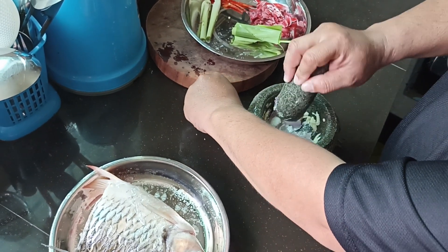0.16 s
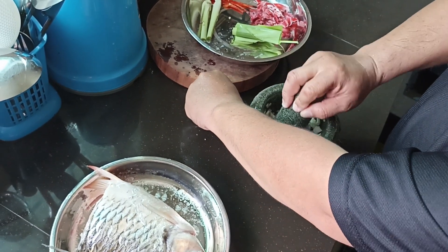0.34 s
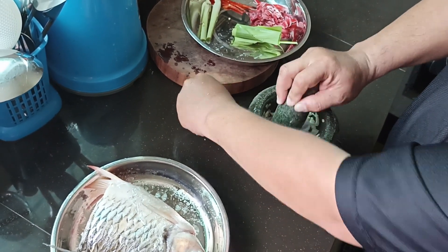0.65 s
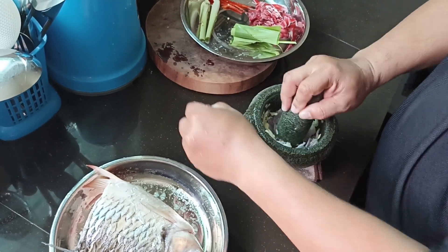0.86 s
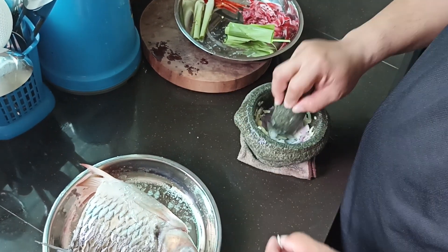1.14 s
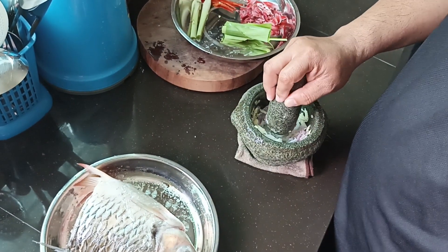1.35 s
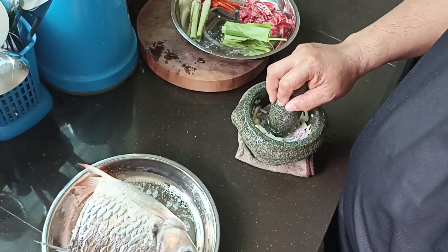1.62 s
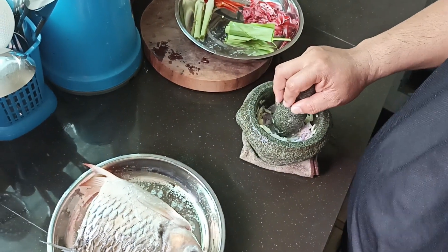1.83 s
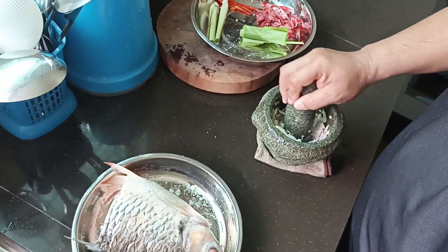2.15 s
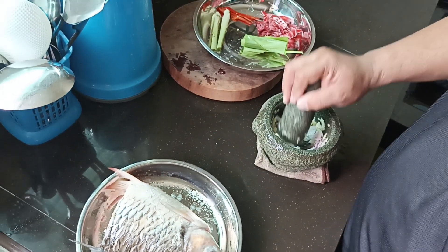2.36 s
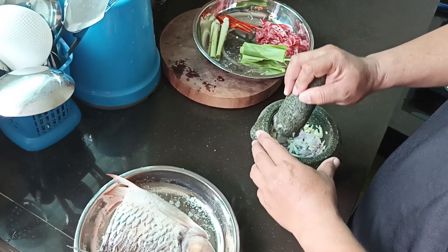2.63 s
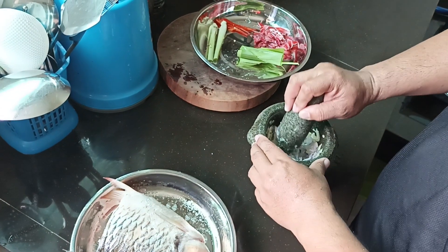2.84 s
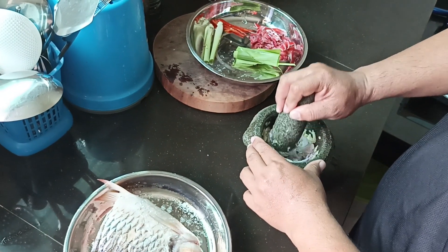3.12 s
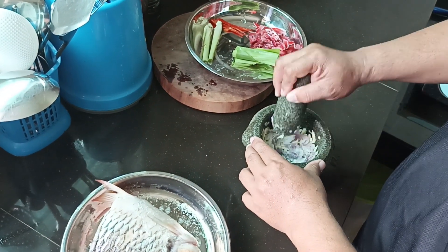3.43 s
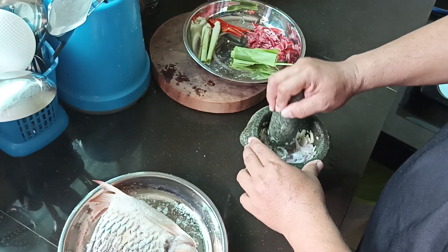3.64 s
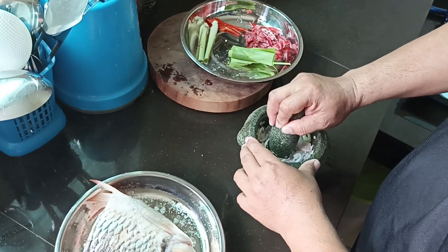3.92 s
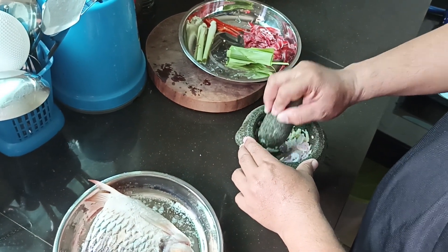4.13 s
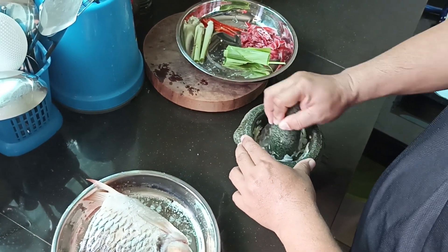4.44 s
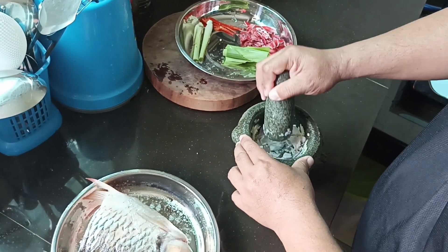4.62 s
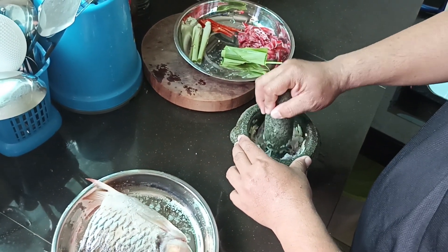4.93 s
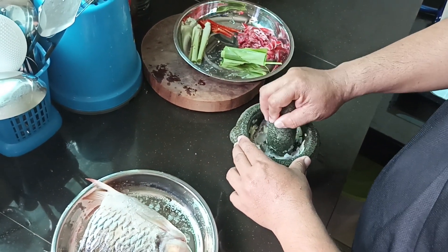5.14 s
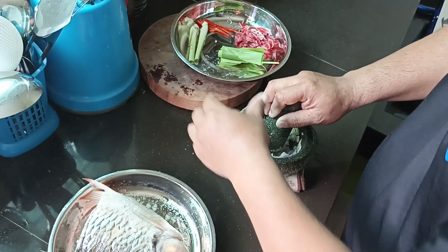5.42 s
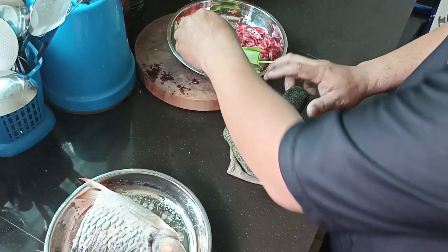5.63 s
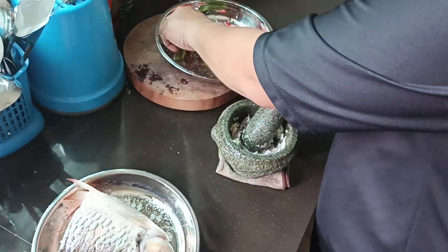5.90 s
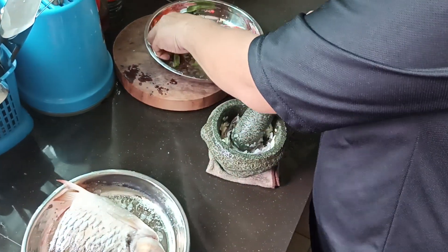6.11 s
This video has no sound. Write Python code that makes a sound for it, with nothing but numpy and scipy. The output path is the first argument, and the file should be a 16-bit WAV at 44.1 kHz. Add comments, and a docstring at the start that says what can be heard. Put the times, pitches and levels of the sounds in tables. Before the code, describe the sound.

On a home kitchen counter a stone pestle pounds moist spices in a small stone mortar, about three strokes a second. Firm strokes crunch and knock with a quick rebound; softer presses only squash. A few bare stone clacks stand out, the last near the end, before pounding stops and fingers rustle lightly in greens. Low appliance hum throbs underneath with soft fan air. Close stereo microphone, brief hard room ring.

```python
"""Appliance motors hum and beat under soft fan noise, with a faint hissing whistle that sinks in pitch and fades.
Then a stone pestle pounds moist spices in a stone mortar on a kitchen counter, about three strokes a second.
Firm strokes crunch, knock through the paste and rebound; gentle presses only squash and slip; three times bare
stone clacks; a hand rustles in a bowl of greens at the end. The hum is beating sines, crunch and rustle are clustered
snaps, each knock is a band-limited blow coloured by the mortar's modes; the hard room rings briefly after them."""
import sys
import numpy as np
from scipy import signal
from scipy.fft import rfft, irfft
from scipy.io import wavfile

SR = 44100
rng = np.random.default_rng(int(sys.argv[2]) if len(sys.argv) > 2 else 0)


def file_out(sig):
    """Save sig as 16-bit WAV at sys.argv[1]."""
    # one column per channel
    cols = np.atleast_2d(sig).T
    # limit, then scale
    lim = np.clip(cols, -1, 1)
    pcm = np.round(lim * 32767).astype(np.int16)
    wavfile.write(sys.argv[1], SR, pcm)


N = 276507
TIME = np.arange(N) / SR

# mains hum and slipping motors: [f/Hz, rms level/dB]
HUM_LINES = [(99.93, -27.6), (102.9, -41), (111.9, -43), (114.8, -34), (122.2, -45), (131.3, -46),
             (155.1, -35.5), (167, -49), (178.9, -43), (199.86, -45), (202.8, -50), (235.6, -50),
             (250.6, -43), (286.4, -46), (357.9, -53), (381.8, -50), (399.75, -50), (405.7, -54),
             (524.7, -58), (663, -62)]
# spectrum of fan rumble and air, before its overall level is set: [f/Hz, relative density/dB]
AIR_SPECTRUM = [(25, -30), (55, -24), (88, -20), (102, 2.5), (140, -6), (210, -13.5), (280, -10),
                (405, -11.5), (450, -18.5), (750, -25), (1300, -34), (2400, -41), (4500, -51.5),
                (10500, -57.5), (15500, -59)]
# likeness of the two channels in the fan noise: [f/Hz, likeness/0-1]
CHANNEL_LIKENESS = [(30, 0.94), (110, 0.95), (250, 0.69), (500, 0.64), (1200, 0), (5000, 0), (15000, 0)]
# path of the faint whistle: [t/s, f/Hz, relative level/dB]
WHISTLE_PATH = [(0, 6200, 0.5), (2.3, 6270, -1), (3, 6170, 0), (4, 5970, -1.5), (4.8, 5930, -5),
                (6.27, 5930, -8.5)]
# firm strokes: [t/s, crunch level before trim/dB, time the spices take to give way/s, knock level/dB,
# knock centre f/Hz, level of the thud into the counter/dB]
FIRM_STROKES = [(.254, -22, .0032, -16.5, 1180, -36), (.5686, -29, 0.0067, -19, 1300, -28),
                (.869, -31.5, .011, -20.5, 1370, -31), (1.1525, -29, 0.011, -25, 1310, -39),
                (1.4922, -24, .0035, -22, 2140, -48), (2.1035, -28.5, 0.0099, -14, 1310, -50),
                (2.410, -25.5, .0075, -5, 1340, -27.5), (3.0036, -23.5, 0.004, -16, 1420, -30),
                (3.2595, -36.5, .017, -8.5, 770, -37), (3.892, -25.5, 0.0047, -11.5, 1640, -27),
                (4.4512, -30.5, .015, -13.5, 1230, -40), (4.7955, -23.5, 0.0082, -7, 1420, -25),
                (5.102, -28, 0.0064, -11, 1190, -46)]
# gentle presses that do not reach the stone: [t/s, crunch level before trim/dB]
GENTLE_PRESSES = [(2.708, -33.5), (3.544, -39), (4.172, -34.5), (5.3645, -35)]
# spectrum of crushed fibres and juice: [f/Hz, relative level/dB]
CRUNCH_SPECTRUM = [(300, -27), (800, -14), (1200, 4), (1800, 0), (2600, 2.5), (3450, 3.5), (4200, -1),
                   (6100, 2), (8500, -4), (10800, -6), (12200, 2.5), (14000, -5.5), (15500, -6.5),
                   (16500, -12)]
# modes of the mortar on its cloth: [f/Hz, width/Hz, level over the dull body of the stone/dB]
MORTAR_MODES = [(690, 240, 2.5), (1150, 55, 8), (1298, 47, 11.5), (1440, 16, 6), (1660, 360, 2),
                (2214, 103, 10), (3380, 140, 5.5)]
# bare stone meets stone: [t/s, energy level/dB, lower edge f/Hz, upper edge f/Hz, rebound level/dB]
STONE_CLACKS = [(3.2592, 0, 560, 2090, -10.5), (4.7994, 11, 1190, 1485, -6), (5.6327, 7.5, 1350, 2250, -18)]
# decay of the kitchen: [f/Hz, t60/s]
KITCHEN_T60 = [(150, 1), (600, 0.55), (1500, 0.62), (4200, 0.5), (11000, 0.5), (16000, 0.3)]
# loudness of the kitchen's tail: [f/Hz, level/dB]
KITCHEN_LEVEL = [(150, 15), (700, 2.5), (1300, -6.5), (2300, -1.5), (5000, -2.5), (12000, -5), (16000, -4)]
# rubs through the spices, a single fibre snap at 2.012 s, and late rustles of a hand in a bowl of greens:
# [start t/s, length/s, level before flutter/dB]
RUBS_AND_RUSTLES = [(.61, .11, -59.5), (1.525, 0.26, -59.5), (2.012, 0.0097, -49.5), (3.27, 0.035, -47.5),
                    (5.812, .045, -61), (6.153, 0.021, -49.5)]
# pestle or rim rings on after a glancing blow: [t/s, f/Hz, starting level before the soft onset/dB, t60/s]
RINGING_MODES = [(3.2584, 5170, -26, 0.02), (4.8060, 2503, -22.5, 0.05), (5.633, 5170, -40, 0.027),
                 (5.6328, 2290, -27, .06)]
# colour of the two microphone ports: [f/Hz, left minus right level/dB]
PORT_BALANCE = [(100, .5), (700, 0), (1250, -3.5), (2200, 0), (3500, .5), (4700, -2), (6000, -5),
                (7700, -5), (9300, -1), (10800, 7), (12300, 12), (14000, 11), (15500, 8)]

# a thick cushion of spices gives way slowly and sounds duller than a thin one
USUAL_GIVE_S, USUAL_RISE_S, RISE_EXPONENT = 0.0078, 0.0016, -0.2
USUAL_TILT_DB, DULLING_DB = -0.43, 2  # treble tilt per octave, and its loss for each doubling of the give
PRESS_RISE_S, PRESS_GIVE_S, PRESS_TILT_DB = 0.0023, 0.011, -1.6
SLIP_S, SLIP_DB = 0.0165, -2  # the pestle slips off the first piece on to the next
# knock through the paste: ratio of its band edges to its centre; then the pestle's own higher click
KNOCK_SPREAD, CLICK_DB, CLICK_LOW_HZ, CLICK_HIGH_HZ = 1.11, -8, 2400, 4220
REBOUND_S, REBOUND_DB = 0.0073, -0.5  # the pestle rebounds and lands again
ATTACK_S, RELEASE_SHARE = 0.0026, 0.25  # a longer rub or rustle also dies away more slowly


def amp(db):
    """Turns decibels into gain."""
    return 10 ** (np.asarray(db) / 20)


def unit(x):
    """Scales to rms 1."""
    return x / np.sqrt(np.mean(x ** 2) + 1e-20)


def read(points, hz):
    """Reads a table on a log-frequency axis."""
    f, value = np.transpose(points)
    return np.interp(np.log(hz + 1), np.log(f + 1), value)


def add(mix, s, sound):
    """Mixes a sound in at time s."""
    part = mix[..., max(round(s * SR), 0):][..., :sound.shape[-1]]
    part += sound[..., :part.shape[-1]]


def colour(x, points, tilt_db=0, size=2048):
    """Minimum-phase filter of unit energy with the given spectrum, tilted per octave about 5 kHz."""
    hz = np.fft.rfftfreq(size, 1 / SR)
    level_db = read(points, hz) + tilt_db * np.log2((hz + 200) / 5000)
    # folding the cepstrum on to positive time makes the filter causal
    cepstrum = irfft(np.log(amp(level_db)))
    cepstrum[1:size // 2] *= 2
    cepstrum[size // 2 + 1:] = 0
    taps = irfft(np.exp(rfft(cepstrum)))
    taps = taps[None] / np.linalg.norm(taps)
    return signal.fftconvolve(x, taps, axes=1)[:, :x.shape[1]]


def drift(per_s):
    """Smooth random movement of rms 1: noise with a Gaussian low-pass."""
    hz = np.fft.rfftfreq(N, 1 / SR)
    noise = rfft(rng.standard_normal(N))
    return unit(irfft(noise * np.exp(-(hz / per_s) ** 2), N))


def grains(length, per_s, spread_db, shared):
    """Tiny snaps of uneven size, partly alike at the two ports."""
    size = amp(spread_db * np.minimum(rng.exponential(1, (3, length)), 3))
    sign = rng.choice([-1, 1], (3, length))
    snaps = size * sign * (rng.random((3, length)) < per_s / SR)
    shared = np.clip(shared, 0, 1)
    return unit(np.sqrt(shared) * snaps[0] + np.sqrt(1 - shared) * snaps[1:])


def hum(waver=0.073, wander=0.09):
    """Close motor lines beat against the mains hum, each wavering in level and phase (rad)."""
    out, coarse = np.zeros(N), np.linspace(0, TIME[-1], 20)
    for hz, db in HUM_LINES:
        level, phase = (np.interp(TIME, coarse, rng.standard_normal(len(coarse))) for _ in range(2))
        tone = np.sin(2 * np.pi * (hz * TIME + rng.random()) + wander * phase)
        out += amp(db) * (1 + waver * level) * tone
    return np.sqrt(2) * out  # rms levels to peaks


def air(level_db=-34):
    """Fan noise: the bass is shared by both ports, the treble is diffuse."""
    hz = np.fft.rfftfreq(N, 1 / SR)
    left, other = rfft(rng.standard_normal((2, N)))
    same = np.clip(read(CHANNEL_LIKENESS, hz), 0, 1)
    right = same * left + np.sqrt(1 - same ** 2) * other
    noise = irfft(np.array([left, right]) * amp(read(AIR_SPECTRUM, hz)), N)
    return amp(level_db) * unit(noise)


def whistle(first_db=-64, octave_db=-66, width_hz=145, flutter_db=2.5, flutter_hz=18):
    """A fuzzy, fluttering whistle and its octave, as from a gas jet: tones smeared by random modulation."""
    s, hz, level_db = np.transpose(WHISTLE_PATH)
    turns = np.cumsum(np.interp(TIME, s, hz)) / SR
    out = np.zeros((2, N))
    for k, db in enumerate([first_db, octave_db], 1):
        for side in out:
            fuzz = drift(width_hz * k) + 1j * drift(width_hz * k)
            side += amp(db) * (fuzz * np.exp(2j * np.pi * k * turns)).real
    return out * amp(np.interp(TIME, s, level_db) + flutter_db * drift(flutter_hz))


def squashes():
    """Every time the spices give way: (t/s, level/dB, rise/s, decay/s, treble tilt/dB per octave)."""
    rows = []
    for s, db, give_s, *_ in FIRM_STROKES:
        cushion = give_s / USUAL_GIVE_S
        rise_s = USUAL_RISE_S * cushion ** RISE_EXPONENT
        tilt_db = USUAL_TILT_DB - DULLING_DB * np.log2(cushion)
        rows.append((s, db, rise_s, give_s, tilt_db))
    for s, db in GENTLE_PRESSES:
        for delay, slip_db in [(0, 0), (SLIP_S, SLIP_DB)]:
            rows.append((s + delay, db + slip_db, PRESS_RISE_S, PRESS_GIVE_S, PRESS_TILT_DB))
    return rows


def crunches(trim_db=-3.0, squish_db=-24, squish_s=0.039, patchy_db=0.7):
    """Fibres snap as the pestle sinks in; juice fizzes on for a moment."""
    out, t = np.zeros((2, N)), np.arange(-SR // 40, SR // 4) / SR
    hz = np.linspace(300, 16500, 56)
    for s, db, rise, decay, tilt_db in squashes():
        press = np.exp(-np.where(t < 0, -t / rise, t / decay))
        squish = amp(squish_db) * (t > 0) * np.exp(-abs(t) / squish_s)
        snaps = grains(len(t), per_s=5500, spread_db=5.5, shared=0.52)
        # air pockets differ with every squash
        pockets = read(CRUNCH_SPECTRUM, hz) + patchy_db * rng.standard_normal(len(hz))
        crunch = colour(snaps * (press + squish), np.c_[hz, pockets], tilt_db)
        add(out, s + t[0], amp(db) * crunch)
    return amp(trim_db) * out


def contacts():
    """Every time the pestle reaches the mortar, rebounds included: (t/s, level/dB, lower f/Hz, upper f/Hz)."""
    blows = [(s, db, hz / KNOCK_SPREAD, hz * KNOCK_SPREAD, REBOUND_DB) for s, _, _, db, hz, _ in FIRM_STROKES]
    rows = [(s, db + CLICK_DB, CLICK_LOW_HZ, CLICK_HIGH_HZ) for s, db, *_ in blows]
    for s, db, low_hz, high_hz, rebound_db in blows + list(STONE_CLACKS):
        rows.append((s, db, low_hz, high_hz))
        rows.append((s + REBOUND_S, db + rebound_db, low_hz, high_hz))
    return rows


def knocks(low_slope=3.22, high_slope=8, scatter_db=-9, scatter_s=0.0035):
    """Place and hardness of each contact set the band in which the mortar's modes are struck."""
    out, t = np.zeros((2, N)), np.arange(SR // 10) / SR
    hz = np.geomspace(60, SR / 2, 900)
    body = 1 + sum(amp(db) ** 2 / (1 + (2 * (hz - f) / width) ** 2) for f, width, db in MORTAR_MODES)
    for s, db, low_hz, high_hz in contacts():
        blow = 1 / (1 + (low_hz / hz) ** (2 * low_slope)) / (1 + (hz / high_hz) ** (2 * high_slope))
        spectrum = np.c_[hz, 10 * np.log10(body * blow + 1e-7)]
        direct = colour(signal.unit_impulse((1, len(t)), (0, 0)), spectrum)
        # hands, counter and dishes throw the knock back within milliseconds, differently to each port
        burst = rng.standard_normal((2, len(t))) * t * np.exp(-2 * t / scatter_s)
        scatter = colour(burst, spectrum)
        scatter *= amp(scatter_db) / np.linalg.norm(scatter, axis=1, keepdims=True)
        add(out, s, amp(db) * (direct + scatter) / np.hypot(1, amp(scatter_db)))
    return out


def thuds(low_hz=85, high_hz=145, energy_decay_s=0.021):
    """Each firm stroke pushes through the cloth into the counter, which booms softly: decaying bass noise."""
    push, t = np.zeros(N), np.arange(SR // 3) / SR
    band = signal.butter(3, [low_hz, high_hz], "band", fs=SR, output="sos")
    for s, *_, thud_db in FIRM_STROKES:
        noise = rng.standard_normal(len(t)) * np.exp(-t / (2 * energy_decay_s))
        add(push, s, amp(thud_db) * noise)
    return signal.sosfilt(band, push) * np.sqrt(SR / (high_hz - low_hz))  # makes up for the narrow band


def kitchen(x, build_s=0.0014):
    """Dense reflections from tiles and counter, each band dying at its own speed."""
    length = SR * 2 // 3
    taps = rng.choice([-1., 1.], (2, length)) * (rng.random((2, length)) < 0.2)
    hz, t, bands = signal.stft(taps, SR, nperseg=256)
    t60 = read(KITCHEN_T60, hz)[:, None]
    fade = amp(read(KITCHEN_LEVEL, hz)[:, None] - 60 * t / t60)
    fade *= np.sqrt(2 * np.log(1000) / t60)  # level then sets the energy of the tail, however long it lasts
    tail = signal.istft(bands * fade, SR, nperseg=256)[1][:, :length]
    tail /= np.sqrt(SR * np.mean(taps ** 2))
    tail *= 1 - np.exp(-(TIME[:length] / build_s) ** 2)
    return signal.fftconvolve(x, tail, axes=1)[:, :N]


def rubs_and_rustles(clump_db=2.5, clump_hz=35):
    """Rubs through the spices, one fibre snap and late rustles in the greens: sparse snaps that clump."""
    snaps = colour(grains(N, per_s=830, spread_db=6.5, shared=0.19), CRUNCH_SPECTRUM, tilt_db=-0.2)
    envelope = np.zeros(N)
    for s, length, db in RUBS_AND_RUSTLES:
        attack = np.clip((TIME - s) / ATTACK_S, 0, 1)
        release = np.exp(-np.maximum(TIME - s - length, 0) / (RELEASE_SHARE * length))
        envelope += amp(db) * attack * release
    return snaps * envelope * amp(clump_db * drift(clump_hz))


def pings(onset_s=0.00043):
    """Single stone modes outlast the blow: decaying sines with a soft onset."""
    out, t = np.zeros(N), np.arange(SR // 5) / SR
    onset = 1 - np.exp(-t / onset_s)
    for s, hz, db, t60 in RINGING_MODES:
        add(out, s, onset * np.sin(2 * np.pi * hz * t) * amp(db - 60 * t / t60))
    return out


def scene():
    """The pounding and rustling in their room, over the hum of the kitchen."""
    background = hum() + air() + whistle()
    handwork = crunches() + knocks() + rubs_and_rustles() + pings()
    return background + handwork + thuds() + kitchen(handwork)


def record(dry, edge_hz=15800):
    """Each microphone port has its own colour; then a low-pass sets the band limit."""
    hz = np.fft.rfftfreq(N, 1 / SR)
    balance = amp(np.outer([0.5, -0.5], read(PORT_BALANCE, hz)))
    ported = irfft(rfft(dry) * balance, N)
    lowpass = signal.firwin(401, edge_hz, window=("kaiser", 9), fs=SR)
    return signal.oaconvolve(ported, lowpass[None], "same")


dry = scene()
out = record(dry)
file_out(out)
```